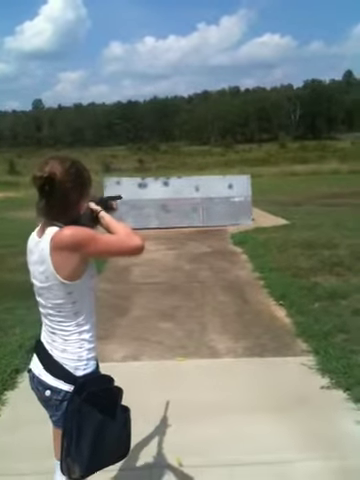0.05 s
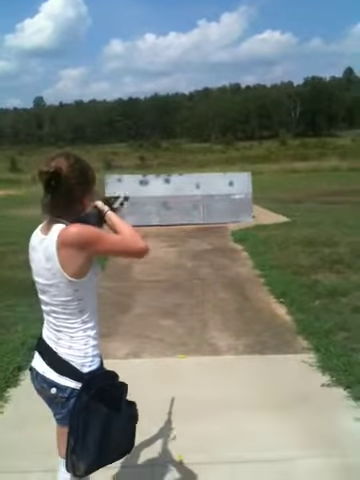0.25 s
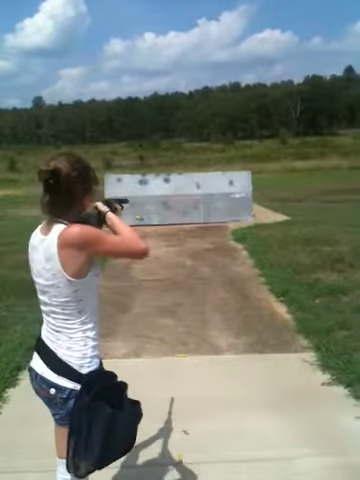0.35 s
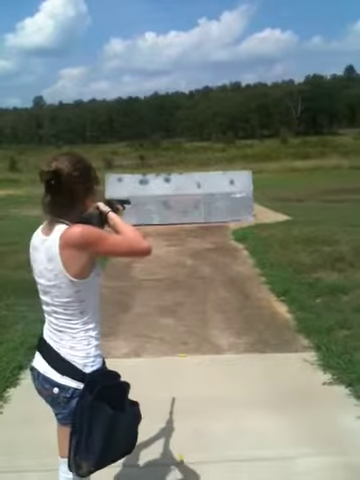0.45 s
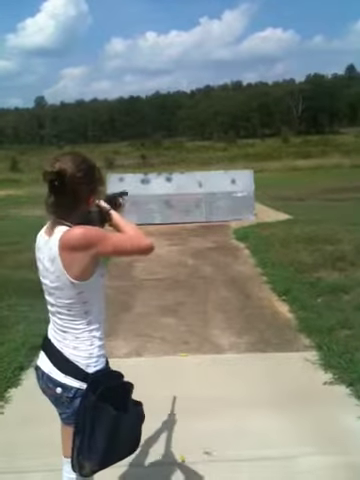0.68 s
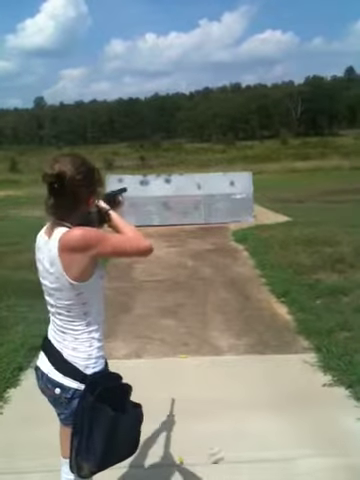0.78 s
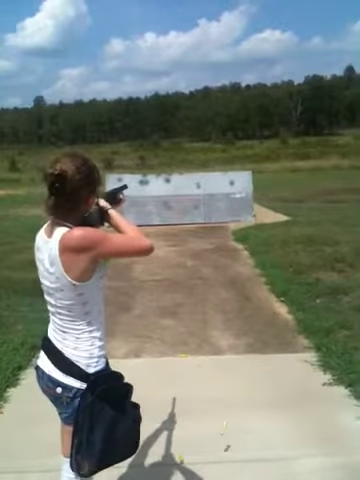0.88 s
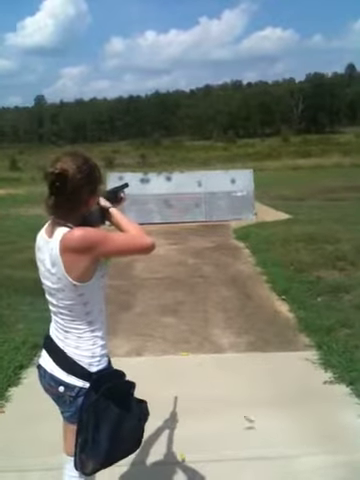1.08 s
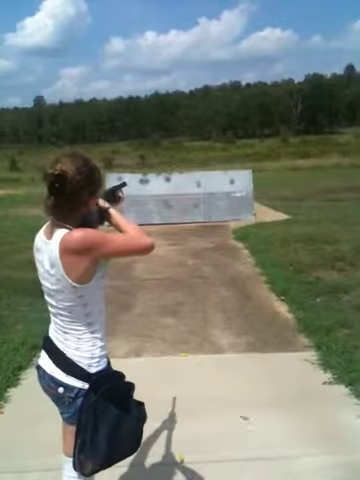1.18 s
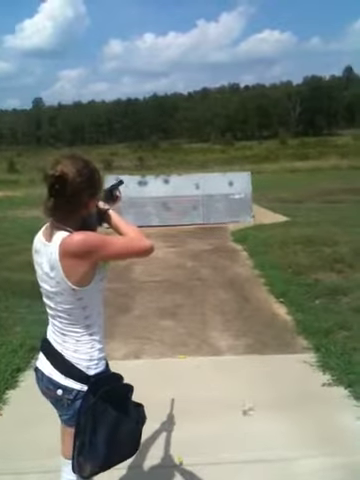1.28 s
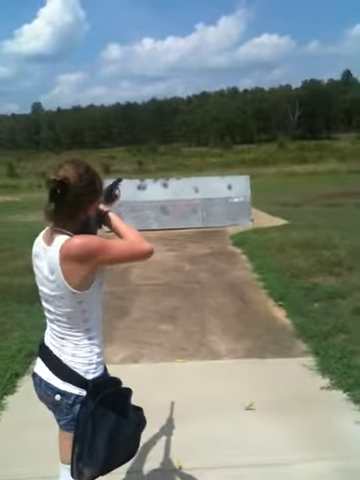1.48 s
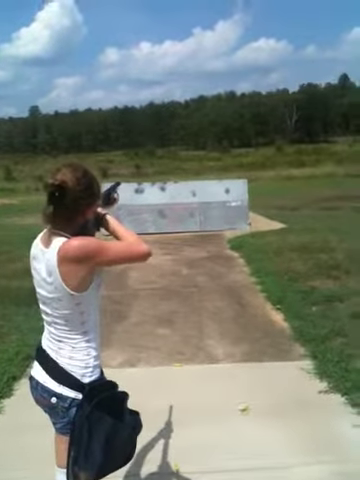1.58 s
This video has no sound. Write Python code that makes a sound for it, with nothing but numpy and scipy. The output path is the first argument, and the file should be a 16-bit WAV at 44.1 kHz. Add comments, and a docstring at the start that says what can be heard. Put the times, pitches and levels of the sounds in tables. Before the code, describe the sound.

A shotgun action is pulled open with sharp steel clacks and slammed shut, close by at an outdoor range. The ejected plastic shell then bounces on concrete, while the echo of an earlier shot rolls away.

```python
"""The echo of a shot is already rolling away over an outdoor range, above quiet air and a faint hum.
In the first 0.3 s a shotgun's action is pulled open: friction and impacts set its steel ringing.
Near 0.75 s it is slammed shut. From 0.84 s the ejected plastic shell bounces on concrete, each
landing exciting its air column, wall and rim. A far wall answers every sound with a faint slap,
and the trees with a thin tail."""
import sys
import numpy as np
from scipy import signal
from scipy.fft import rfft, irfft
from scipy.io import wavfile
from scipy.ndimage import uniform_filter1d

SR = 44100
rng = np.random.default_rng(int(sys.argv[2]) if len(sys.argv) > 2 else 0)


def to_wav(s):
    """Save 16-bit WAV."""
    ch = np.atleast_2d(s).T  # columns
    pcm = np.round(np.clip(ch, -1, 1) * 32767)  # PCM
    wavfile.write(sys.argv[1], SR, pcm.astype(np.int16))


N = 72765
IMPACT_SAMPLES = 4096
TIME, IMPACT_TIME = np.arange(N) / SR, np.arange(IMPACT_SAMPLES) / SR
BIN_HZ = np.fft.rfftfreq(IMPACT_SAMPLES, 1 / SR)

# Impacts in the action: t/s, level/dB, t60/s, timbre (0 rear stop to 1 breech), bass/dB, treble/dB
IMPACTS = [(0.053, -47.5, 0.015, 0.31, 12, -17.5), (0.066, -47, .025, 0, 14.5, -17),
           (0.0895, -31, 0.045, .3, -9.5, -2), (0.099, -28.5, 0.012, 0.95, -16, -1.5),
           (.146, -34, .01, 0, -13.5, 5.5), (.1518, -33.5, 0.027, 0, -8, -7.5),
           (0.166, -39.5, 0.013, 0.2, 1, 5), (0.1927, -30.5, 0.051, 0.082, -23, 4),
           (0.1976, -40, 0.15, 0.55, 6, -6.5), (0.2343, -18.5, 0.0068, 0, 5, 7),
           (.238, -8, 0.024, 0, -8.5, 6.5), (.2435, -26.5, 0.084, 0, -10.5, -0.5),
           (.2495, -32, .03, 0.6, 14, 5), (0.253, -18, 0.018, 0, -22.5, 19),
           (0.258, -26, 0.011, 0, 8, -4.5), (0.2624, -33, 0.012, 0, -2.5, 0),
           (0.2819, -31, 0.044, 0.19, -15, 2), (0.6269, -52.5, 0.11, 0, -4.5, -10),
           (0.682, -49, 0.029, 0.077, -21, 5.5), (0.697, -24.5, .02, 0, -10.5, 10),
           (0.6992, -21.5, 0.0089, 0, -42, -30.5), (0.7169, -27.5, 0.016, 0.1, 0, 12),
           (.724, -28.5, 0.011, 0.18, -18, 11), (0.7458, -28, 0.019, 0.2, -16, 30),
           (0.7587, -28, 0.075, 0.38, 4.5, -8), (.764, -17, 0.055, 1, 3.5, 16.5),
           (.7727, -23, .022, 0.99, 10, -7.5), (0.776, -14.5, 0.0056, 0.5, -3, -41.5),
           (.782, -24, 0.029, 0.54, 5, 9), (0.798, -33.5, 0.0161, 0.95, -2.5, -13),
           (0.8857, -40, 0.022, 0.796, -10, -9)]
# Spectra of steel struck at the rear stop, struck at the breech and sliding: f/Hz, relative level/dB
REAR_SPECTRUM = [(40, -45.5), (150, -23), (250, -13.5), (450, -14), (850, -5), (1500, -8.5), (3000, -10),
                 (4300, -6.5), (4900, -9), (5400, -2.5), (6200, -11.5), (7000, -4), (8200, -14.5),
                 (9300, -5), (10600, -7), (11800, -16.5), (13500, -13.5), (15500, -17), (17000, -39.5)]
BREECH_SPECTRUM = [(40, -38), (120, -21.5), (190, -15.5), (500, -12), (900, -18), (1400, -12.5), (2050, -5),
                   (2800, 1), (4300, -0.5), (5200, -18.5), (6000, 10.5), (7900, 1.5), (9400, -0.5),
                   (11000, -2.5), (12700, -9), (13800, 5.5), (15000, -2.5), (15800, -18.5), (17000, -32)]
RAIL_SPECTRUM = [(100, -27.5), (600, -14.5), (1600, -7.5), (2050, 1.5), (2700, -6), (4400, 1.5),
                 (5400, 2.5), (6300, 1), (7800, -3.5), (10000, 1.5), (12400, -11), (13500, -2),
                 (15600, -19), (17000, -27)]
# Normal modes of the steel parts and of the stock: f/Hz, relative level/dB, t60/s
STEEL_MODES = [(2055, -1, .1), (4215, -1, .07), (5425, -2, .06), (5868, -1, .08), (6728, -3, .06),
               (7020, -6, .04), (7390, -4, .06), (8765, -3, .08), (9030, -3, .04), (9540, -4, .05),
               (10003, -3, .05), (13592, -2, .07), (14110, -5, .05)]
STOCK_MODES = [(184, -34.5, 0.017), (274, -28, 0.02), (870, -19, 0.027), (935, -30.5, 0.01)]
# Friction envelopes of the bolt going back and going forward: t/s, level/dB
PULL_ENVELOPE = [(.088, -42), (.105, -52.5), (.138, -70), (.176, -53.5), (.185, -39.5), (.189, -46.5),
                 (.205, -45.5), (.218, -56.5), (.232, -31.5), (.25, -37), (.268, -30.5), (.277, -59.5),
                 (.30, -60), (.345, -58.5)]
PUSH_ENVELOPE = [(.667, -57), (.672, -46.5), (.693, -44.5), (.704, -36), (.733, -37.5), (.748, -36.5),
                 (.776, -24), (.788, -43.5), (.808, -73.5), (.83, -68)]
# Shell landings: t/s; air column f/Hz, level/dB, t60/s; level/dB of the wall, crimp, rim and top
# bands; tick level/dB, tick treble/dB
LANDINGS = [(0.8373, 1448, -17, 0.032, -17.5, -3, -21.5, -23.5, -30, -4.5),
            (1.1845, 1343, -45.5, 0.031, -54, -43.5, -37, -46.5, -42, -8),
            (1.2805, 1384, -43, 0.029, -42.5, -44, -49, -58, -37.5, -3),
            (1.3404, 1443, -30.5, 0.037, -22.5, -27.5, -31.5, -25.5, -32, 10),
            (1.397, 1360, -54, .03, -67, -65, -37.5, -50, -50.5, -5),
            (1.4496, 1450, -42, 0.034, -40, -47.5, -40, -55, -52.5, -9.5),
            (1.4768, 1440, -39, 0.037, -47, -50, -37.5, -54, -47, -5.5),
            (1.526, 1440, -45.5, 0.056, -48, -50, -38, -52, -51.5, -9),
            (1.553, 1440, -58, 0.043, -50, -60.5, -52, -55, -63.5, -6.5),
            (1.6014, 1435, -65, 0.057, -41.5, -51, -36, -54, -50, 7),
            (1.6078, 1393, -54.5, 0.04, -47, -58, -40, -64, -44.5, 7),
            (1.6241, 1400, -51.5, 0.031, -42, -55, -28, -47, -49.5, 9)]
# Centres of the wall, crimp, rim and top bands: f/Hz
SHELL_BANDS = [3500, 4700, 5700, 7100]
# Normal modes of the shell's wall and brass rim: f/Hz, relative level/dB, t60/s
SHELL_MODES = [(3382, -4.5, 0.018), (3930, -6, 0.0078), (4386, -14.5, 0.014), (4790, -1, 0.0036),
               (5450, -3, 0.0088), (5695, -11.5, 0.016), (7000, -4, 0.015), (9170, -12, 0.023),
               (11570, -16, 0.0092), (14600, -17, 0.0104)]
# Spectra of the shell's contact tick and of the far wall's echo: f/Hz, relative level/dB
TICK_SPECTRUM = [(200, -19.5), (900, 9), (2200, 6.5), (5000, -16.5), (8000, 6.5), (12500, 4), (16000, -13)]
SLAP_SPECTRUM = [(300, -4.5), (1500, -5.5), (3300, 1.5), (6500, 0), (9500, -3), (15000, -5.5)]
# Decay of the trees' tail and of the shot's echo: f/Hz, relative initial level/dB, t60/s
TREE_DECAY = [(100, 1, 0.97), (800, -5, 0.6), (2040, -1.5, 1), (5060, -6, 0.47), (8750, -11, 1),
              (16220, -18.5, 0.36)]
SHOT_DECAY = [(40.2, -51.5, 1.4), (119, -21.5, 8), (261, -5, 2.3), (540, -4, 3.46), (771, 5, 2.56),
              (1111, -2.5, 2.01), (1904, 5.5, 1.31), (3000, -1, 1.12), (6300, -3.5, 1.02), (10000, -16, .8),
              (16000, -46.5, .8)]
# Swell laid over the decay of the shot's echo: t/s, gain/dB
SHOT_SWELL = [(0, -21.5), (.008, -11.5), (0.017, -8), (0.062, 1.5), (.09, -4.5), (0.127, -8), (0.178, -5),
              (.31, 6.5), (.45, 8.5), (.6, 8), (.85, 6), (1.1, 6), (1.65, 7.5)]
# Spectrum of the quiet air: f/Hz, relative level/dB
AIR_SPECTRUM = [(15, -59), (25, -42), (70, -3), (180, 6), (962, -11.5), (1400, -2.5), (1940, -11.5),
                (2840, -13), (4870, -12), (5570, -14), (6210, -13.5), (7110, -12.5), (16000, -23.5)]


def action():
    """Resonance: friction and impacts drive the steel's modes; the concrete adds an early reflection."""
    drive, t = friction(), np.arange(SR // 4) / SR
    for start, *blow in IMPACTS:
        add(drive, start, impact(*blow))
    # Scaling by decay rate makes each resonance's peak gain independent of its t60.
    modes = sum(amp(db) * 2 * np.log(1000) / (t60 * SR) * decay(t, t60) * np.cos(2 * np.pi * hz * t)
                for hz, db, t60 in STEEL_MODES)
    out = drive + amp(-3) * signal.fftconvolve(drive, modes)[:N]
    add(out, start=0.0039, sound=amp(-13) * out)  # off the concrete
    return out


def impact(db, t60, breech, bass_db, treble_db):
    """Impact excitation: steel on steel radiates a broadband clack and knocks the stock's low modes."""
    t, rise_s = IMPACT_TIME, 0.00045
    spectrum = (1 - breech) * read(REAR_SPECTRUM) + breech * read(BREECH_SPECTRUM)
    spectrum += read([(900, bass_db), (4500, 0.0074), (11000, treble_db)])
    clack = colour(contact_burst(rise_s, t60), spectrum)
    knock = sum(amp(mode_db + bass_db) * decay(t, mode_t60) * np.cos(2 * np.pi * hz * t)
                for hz, mode_db, mode_t60 in STOCK_MODES)
    return amp(db) * (clack + knock * onset(rise_s))


def friction():
    """Sliding friction: small random slips and smooth rubbing make noise along the rails."""
    slips_per_s, spread_db, rub_share = 2000, 5, 0.6
    slips = (rng.random(N) < slips_per_s / SR) * rng.choice([-1, 1], N)
    slips = slips * amp(spread_db * np.minimum(rng.exponential(1, N), 2))
    grain = np.sqrt(1 - rub_share) * unit_rms(slips) + np.sqrt(rub_share) * rng.standard_normal(N)
    return colour(grain, read(RAIL_SPECTRUM)) * (envelope(PULL_ENVELOPE) + envelope(PUSH_ENVELOPE))


def shell():
    """Free vibration: each landing rings air column, wall and rim, by amounts set by which end hits."""
    out, t = np.zeros(N), IMPACT_TIME
    for start, tube_hz, tube_db, tube_t60, *band_db, tick_db, treble_db in LANDINGS:
        tube = amp(tube_db) * decay(t, tube_t60) * np.sin(2 * np.pi * tube_hz * t)
        wall = sum(amp(db + np.interp(hz, SHELL_BANDS, band_db)) * mode_pair(hz, t60)
                   for hz, db, t60 in SHELL_MODES)
        spectrum = read(TICK_SPECTRUM) + read([(4500, 0.0052), (12000, treble_db)])
        tick = amp(tick_db) * colour(contact_burst(rise_s=0.0001, t60=0.0077), spectrum)
        add(out, start, tube * onset(rise_s=0.00059) + wall * onset(rise_s=0.00025) + tick)
    # So small a body radiates low frequencies poorly.
    out = signal.sosfilt(signal.butter(2, 970, "highpass", fs=SR, output="sos"), out)
    return out + amp(-27) * signal.fftconvolve(out, scatter(fade_s=0.015))[:N]


def mode_pair(hz, t60):
    """Mode splitting: a tube not quite round rings in close pairs, which shift at each landing."""
    t, detune, split, twin_db = IMPACT_TIME, 0.013, 0.062, -3.5
    hz = hz * (1 + detune * rng.uniform(-1, 1))
    twin_hz = hz * (1 + split * rng.uniform(-1, 1))
    twin = amp(twin_db) * np.sin(2 * np.pi * (twin_hz * t + rng.random()))
    return decay(t, t60) * (np.sin(2 * np.pi * (hz * t + rng.random())) + twin)


def contact_burst(rise_s, t60):
    """Superposition: many tiny contacts merge into a brief noise with an even spectrum."""
    shape = onset(rise_s) * decay(IMPACT_TIME, t60)
    burst = shape * rng.standard_normal(IMPACT_SAMPLES)
    for _ in range(2):  # flatten the spectrum, then restore the envelope
        spectrum = rfft(burst)
        burst = irfft(spectrum / (abs(spectrum) + 1e-12), IMPACT_SAMPLES)
        burst *= shape / np.sqrt(abs(uniform_filter1d(burst ** 2, size=48)) + 1e-14)
    return burst


def reflections(direct):
    """Reflection: the trees return a diffuse tail, a far wall a slap smeared by what stands near it."""
    tail_rise_s = 0.023
    tail = decaying_noise(TREE_DECAY) * np.minimum(TIME / tail_rise_s, 1)
    response = amp(-30) * tail / np.linalg.norm(tail)
    slap = amp(-31.5) * scatter(fade_s=0.046)
    slap[0] += amp(-30.5)  # the wall's specular reflection
    add(response, start=0.116, sound=colour(slap, read(SLAP_SPECTRUM)))
    return signal.fftconvolve(direct, response)[:N]


def scatter(fade_s):
    """Scattering: nearby objects give dense, quickly dying reflections, here of unit energy."""
    taps = rng.standard_normal(N) * np.exp(-TIME / fade_s)
    return taps / np.linalg.norm(taps)


def shot_echo():
    """Reverberation: the shot's echo swells and rolls away, the treble dying first."""
    swell = amp(np.interp(TIME, *np.transpose(SHOT_SWELL)))
    return amp(-41) * swell * decaying_noise(SHOT_DECAY)


def ambience():
    """Ambient noise: steady, quiet air and a faint hum that wavers by phase modulation."""
    hum_hz, waver_rad = 183.6, 0.35
    air = amp(-68) * unit_rms(colour(rng.standard_normal(N), read(AIR_SPECTRUM)))
    drift = uniform_filter1d(rng.standard_normal(N), size=2000)
    waver = unit_rms(uniform_filter1d(drift, size=2000))
    hum = amp(-74.5) * np.sqrt(2) * np.sin(2 * np.pi * hum_hz * TIME + waver_rad * waver)
    return air + hum


def decaying_noise(table):
    """Frequency-dependent damping: each band of a noise dies at its own rate."""
    hz, t, bands = signal.stft(rng.standard_normal(N), SR, nperseg=1024)
    initial = unit_rms(amp(read(table, hz)))[:, None]
    t60 = read(table, hz, column=2)[:, None]
    return signal.istft(bands * initial * decay(t, t60), SR)[1][:N]


def colour(x, db):
    """Minimum-phase filtering: imposes a spectral shape at unit power gain."""
    log_gain = np.log(unit_rms(amp(db)) + 1e-6)
    two_sided = np.r_[log_gain, log_gain[-2:0:-1]]
    taps = np.fft.ifft(np.exp(np.conj(signal.hilbert(two_sided)))).real
    return signal.fftconvolve(x, taps[:len(db)])[:len(x)]


def read(points, hz=BIN_HZ, column=1):
    """Interpolation of a table's column on a log-frequency axis."""
    table = np.array(points, float)
    return np.interp(np.log(hz + 1), np.log(table[:, 0] + 1), table[:, column])


def envelope(points):
    """Amplitude envelope through points (t/s, level/dB), silent outside them."""
    return amp(np.interp(TIME, *np.transpose(points), left=-150, right=-150))


def onset(rise_s):
    """Exponential rise of an impact."""
    return 1 - np.exp(-IMPACT_TIME / rise_s)


def decay(t, t60):
    """Exponential damping by 60 dB in t60 seconds."""
    return np.exp(-np.log(1000) * t / t60)


def amp(db):
    """Amplitude ratio of a level in decibels."""
    return 10 ** (np.asarray(db) / 20)


def unit_rms(x):
    """Normalisation to unit mean power."""
    return x / np.sqrt(np.mean(x ** 2) + 1e-20)


def add(mix, start, sound):
    """Superposition of a sound delayed by start seconds."""
    part = mix[round(start * SR):][:len(sound)]
    part += sound[:len(part)]


def scene():
    """Superposition: direct sound, reflections and background sum in one channel."""
    gun, bounces = action(), shell()
    echoes = reflections(gun + amp(-5) * bounces)  # low on the ground, the shell wakes less echo
    return (gun + bounces + echoes + ambience() + shot_echo())[None]


def record(dry):
    """Band limiting: a linear-phase low-pass filter removes the highest treble."""
    lowpass = signal.firwin(255, 15950, window=("kaiser", 8), fs=SR)
    return signal.oaconvolve(dry, lowpass[None], "same")


dry = scene()
out = record(dry)
to_wav(out)
```